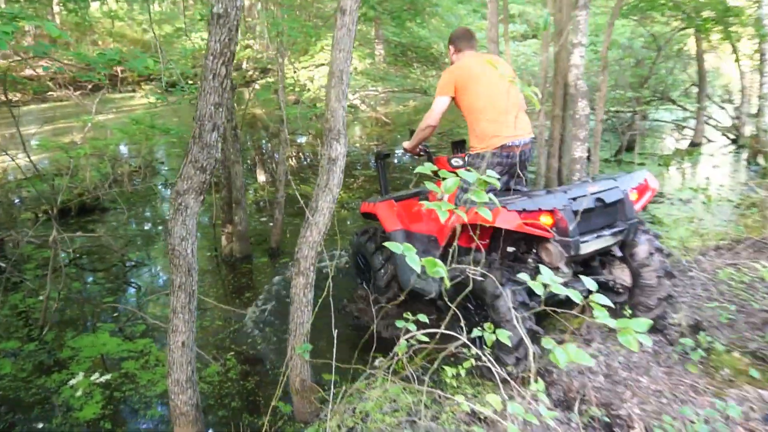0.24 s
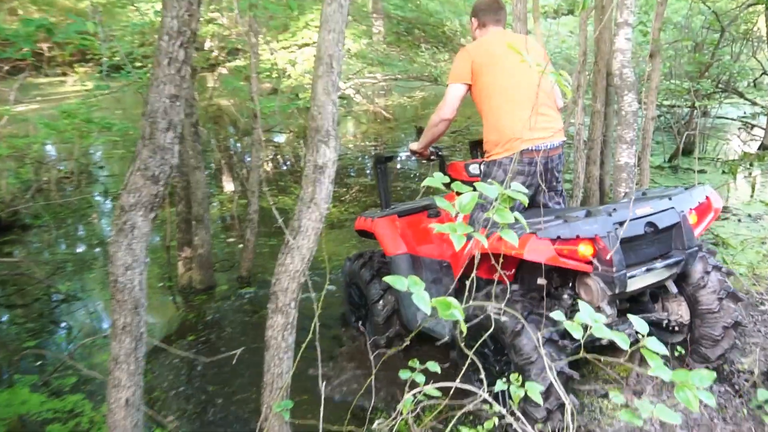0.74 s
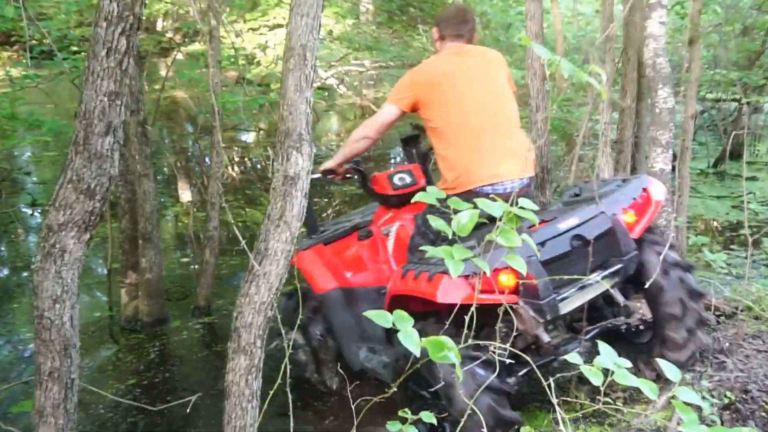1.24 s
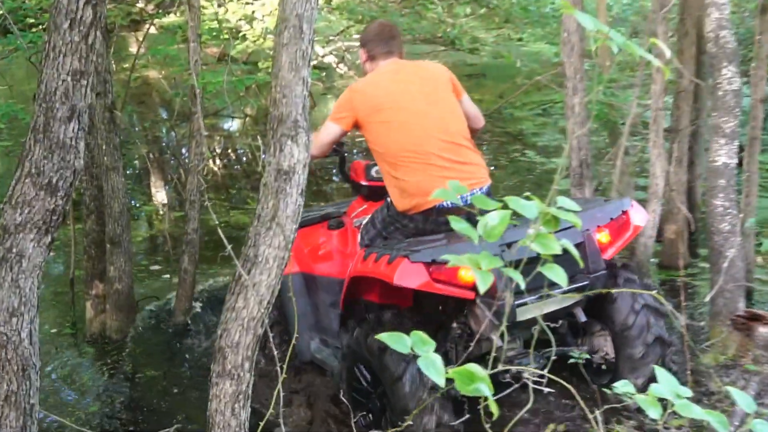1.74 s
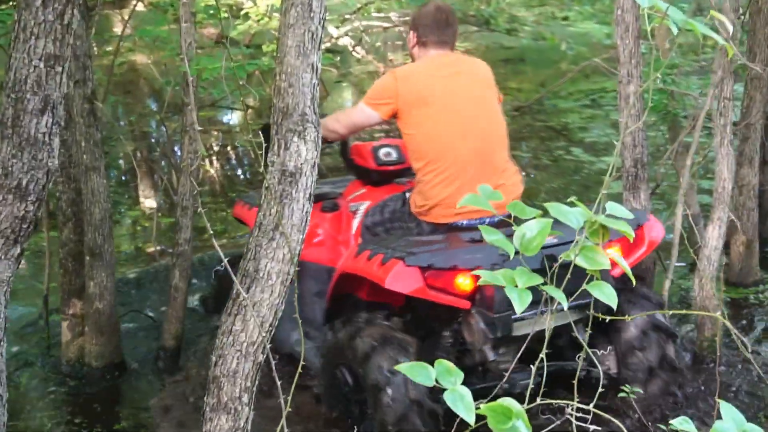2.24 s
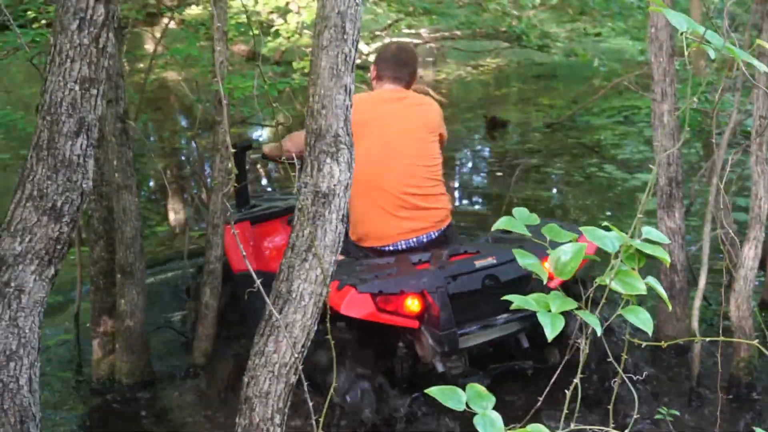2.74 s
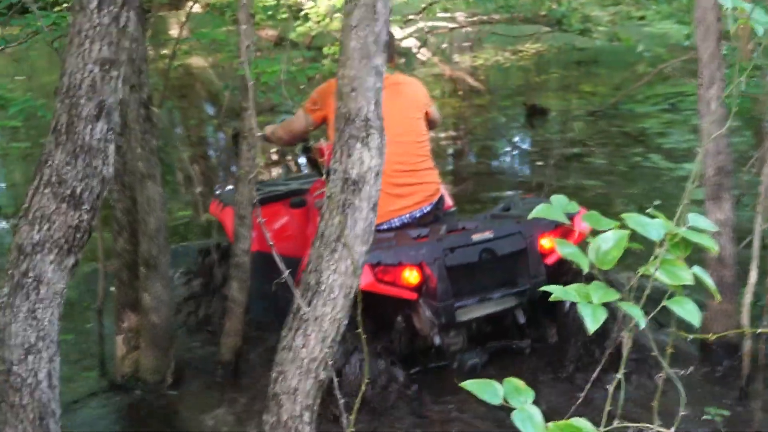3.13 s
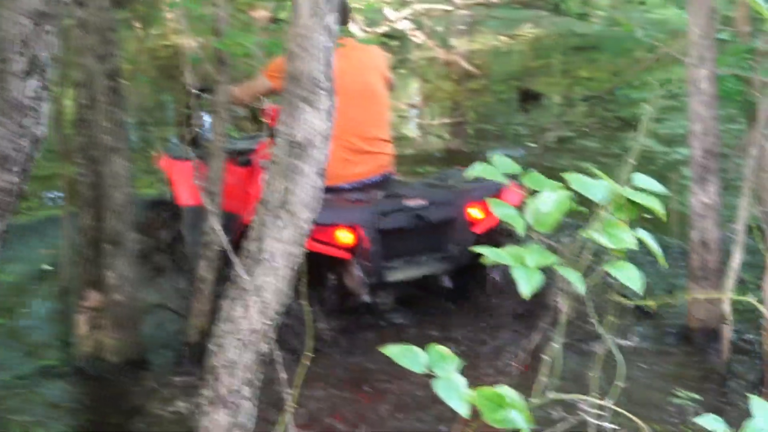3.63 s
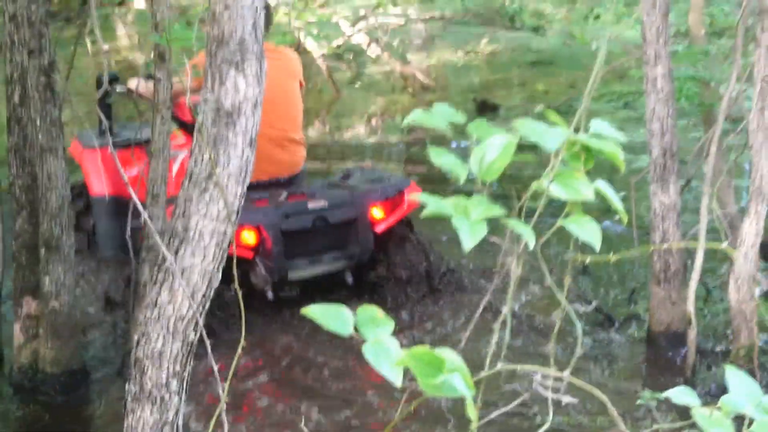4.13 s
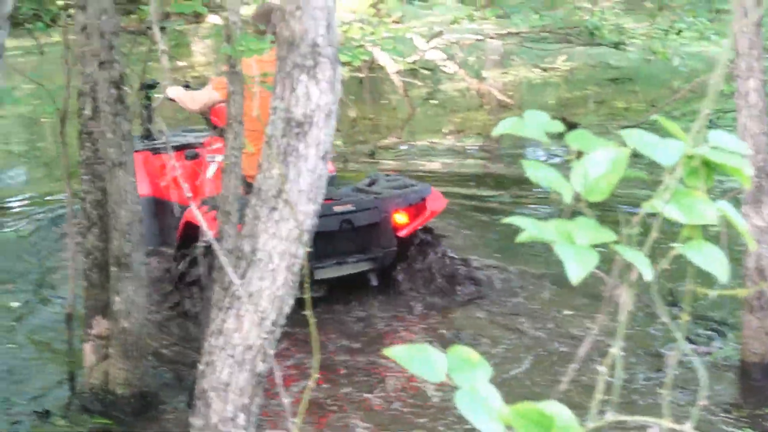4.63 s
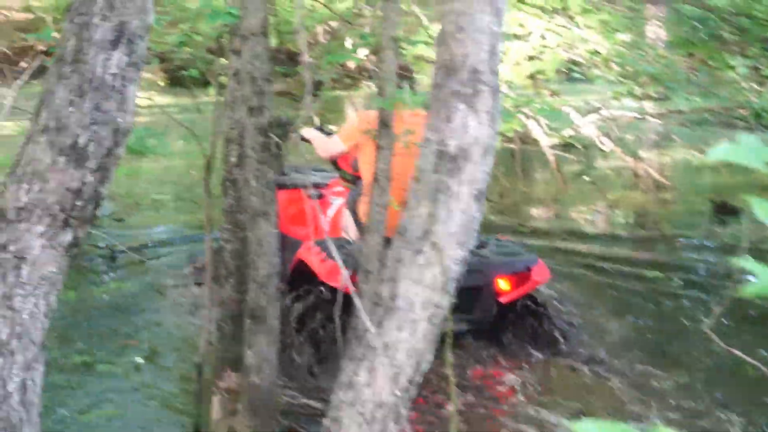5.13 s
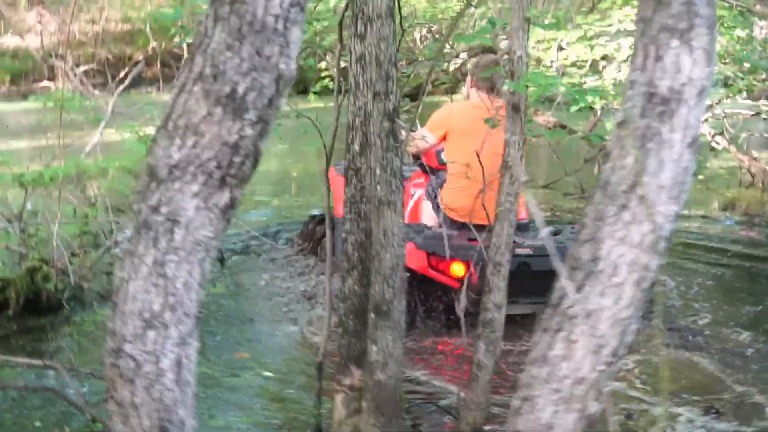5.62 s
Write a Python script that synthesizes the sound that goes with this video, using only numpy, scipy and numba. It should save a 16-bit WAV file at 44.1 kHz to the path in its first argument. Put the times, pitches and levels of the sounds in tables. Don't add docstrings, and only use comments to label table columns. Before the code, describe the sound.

A quad bike a few metres away drives into a woodland pond. Its uneven twin-cylinder engine starts with sharp cracks, climbs in a rough growl, drops, blips, drops again, then holds high revs. Loose metal rattles and buzzes, tyres churn the water with hissing spray, and bubbling gurgles gather near the end. Small stereo microphones outdoors, slightly overloaded, with a short echo from the trees.

```python
import sys
import numpy as np
from scipy import signal
from scipy.fft import next_fast_len
from scipy.io import wavfile
from scipy.ndimage import uniform_filter1d
from numba import njit

SR = 44100
rng = np.random.default_rng(int(sys.argv[2]) if len(sys.argv) > 2 else 0)


def dump_mix(stems):
    frames = np.atleast_2d(stems).T
    limited = np.clip(frames, -1, 1)
    pcm = np.round(limited * 32767).astype(np.int16)
    wavfile.write(sys.argv[1], SR, pcm)


def volts_from_db(level):
    exponent = np.asarray(level, float) / 20
    return 10 ** exponent


N = 258772

# f/Hz, width/Hz, level/dB
SHIELD_MODES = [(1549.5, 43, 14), (2106, 210, 10.5)]


def controls():
    # t/s, engine cycles/Hz
    speed = [(0.0, 15.8), (0.16, 12.09), (0.35, 15.87), (0.89, 23.02), (1.39, 24.34), (1.81, 15.7),
             (2.05, 20.62), (2.53, 24.87), (2.86, 15.45), (3.05, 21.82), (3.34, 21.12), (3.54, 24.05),
             (3.89, 23.61), (4.08, 24.49), (4.92, 22.47), (5.18, 25.7), (5.6, 24.61), (5.87, 25.83)]
    # t/s, throttle/0-1, silencer boom level/dB
    engine_load = [(0.0, .9, -29.5), (0.05, 1, -7.5), (0.11, 0.8, -36), (0.15, 0.97, -11.5),
                   (1.3, 0.98, -11), (1.42, 0.43, -20), (1.57, 0, -14), (1.78, 0, -19.5), (1.84, 1, -11),
                   (2.5, 1, -11), (2.58, 0.22, -15.5), (2.83, 0.13, -18.5), (2.9, 1, -13.5),
                   (3.28, 0.78, -10), (3.42, 1, -10.5), (5.05, 1, -10.5), (5.4, 1, -16.5), (5.87, 1, -14.5)]
    # t/s, depth/0-1, left minus right/dB
    wade = [
        (0.0, 0.2, -2.5),
        (0.5, 0.25, -4),
        (1.2, 0, -1),
        (1.9, 0.38, -1),
        (2.5, 0.62, -1),
        (3.3, 0.85, -1),
        (3.9, 0.93, 1.5),
        (4.9, 0.89, -0.2),
        (5.87, 0.88, -.7),
    ]
    (hz,), (throttle, boom_db), (depth, pan_db) = columns(speed), columns(engine_load), columns(wade)
    lag = int(0.11 * SR)
    gain_hz_per_s = uniform_filter1d(np.gradient(hz) * SR, lag, origin=(lag - 1) // 2)
    pull = np.tanh(np.clip(gain_hz_per_s, 0, None) / 12.4)
    return hz, np.clip(throttle, 0, 1), boom_db, depth, pan_db, pull


def layer_levels(hz, throttle, depth, pull):
    # level at full speed/dB, rise/dB per cycle Hz, throttle shut/dB, full depth/dB, gaining speed/dB
    level_laws = dict(bark=(-25, 1.25, -12, -7.5, 3), rasp=(-37, 1.2, 4.5, 9.5, 2),
                  drone=(-45.5, 0.2, -2, 18, 2.5), hum=(-23, 0, 4, -4.5, -1.5),
                  casing=(-32, .3, 0.1, 2.5, -1.5), covers=(3, .05, 3, -8.5, 3),
                  shield=(-34, 0.7, -0.5, -3.6, 0.7), gears=(-45, 0.8, 4, -11, 9.5),
                  rumble=(-33, 0.3, -0.5, 4, 0), churn=(-33, 0.22, 5.5, -0.2, -2),
                  spray=(-42.5, 0.24, 1.5, 1.2, -0.5))
    full_speed_hz = 24
    levels = {}
    for name, (full_db, per_hz, shut_db, deep_db, pull_db) in level_laws.items():
        riding = full_db + per_hz * (hz - full_speed_hz) + shut_db * (1 - throttle)
        levels[name] = riding + deep_db * depth + pull_db * pull
    return levels


def firings(hz, count=200):
    start_cycle, pipe_delay_s, gas_lag_s = 0.03, 0.0085, 0.004
    second_share, second_db = 0.387, 1.5
    cycle = start_cycle + np.cumsum(hz) / SR + pipe_delay_s * hz
    chance = rng.standard_normal((count, 2, 2))
    pulses = np.zeros(N)
    for k, (offset, db) in enumerate([(0, 0), (second_share, second_db)]):
        at = np.searchsorted(cycle, np.arange(count) + offset + 0.0025 * chance[:, k, 0])
        ok = (at > 0) & (at < N)
        pulses[at[ok]] = volts_from_db(db + 0.51 * chance[ok, k, 1])
    last = np.maximum.accumulate(np.where(pulses > 0, np.arange(N), 0))
    since = np.roll(np.arange(N) - last, int(gas_lag_s * SR)) / SR
    return pulses, since


def exhaust(pulses, hz, hum_db, *levels_db):
    # f/Hz, width/Hz, level/dB
    pipe_modes = [(245, 74, -1.5), (277.3, 25.7, 1.5), (314.9, 42, -1)]
    # f/Hz, width/Hz, level/dB
    frame_modes = [(55.3, 22.4, 0)]
    # f/Hz, width/Hz
    traps = [(172, 60), (255, 100)]
    second = np.cumsum(pulses > 0) % 2
    uneven = pulses * (1 - 0.5 * second) * volts_from_db(2.5 * rng.standard_normal(N))

    def chamber(drive, rest_hz, rise, width_hz):
        centre = rest_hz + rise * hz
        return svf(svf(drive, centre, width_hz), centre, width_hz)

    boom = chamber(pulses, 33, 3.55, 54.0)
    for trap_hz, width in traps:
        boom = boom - ring(boom, [(trap_hz, width, 0)])
    thud = chamber(pulses, 14, 2.3, 26.0)
    bark = chamber(pulses * (1 - 0.72 * second), 120, 2.75, 44.0)
    bark = bark - 1.03 * ring(bark, [(232, 160, 0)])
    rasp = sum(ring(uneven, [mode], order=2) for mode in pipe_modes[1:])
    drone = ring(uneven, pipe_modes[:1], order=2)
    voices = boom, -thud, bark, -rasp, -drone
    frame = even(ring(pulses, frame_modes, order=2)) * volts_from_db(hum_db)
    return frame + sum(even(v) * volts_from_db(db) for v, db in zip(voices, levels_db))


def metalwork(since, db):
    # f/Hz, width/Hz, level/dB
    casing_modes = [(500, 182, -2), (660, 280, 2), (800, 156, -0.5), (1053, 430, -5), (1457, 410, -5)]
    # f/Hz, width/Hz, level/dB
    gear_modes = [(5860, 120, -5), (4294, 130, -0.5), (3355, 120, -5), (11030, 1600, -9.5)]
    # f/Hz, width/Hz, level/dB
    cover_modes = [(775, 125, 1), (1340, 130, 2)]

    def rattle(decay_s, steady, uneven_db, rate):
        hits = (steady + np.exp(-since / decay_s)) * rng.standard_normal(N)
        return hits * volts_from_db(uneven_db * walk(rate))

    casing = even(ring(rattle(0.012, 0.57, 2.9, 18), casing_modes, order=2)) * volts_from_db(db["casing"])
    shield = even(ring(rattle(0.015, 0.26, 4.2, 21.95), SHIELD_MODES), 1.0) * volts_from_db(db["shield"] - 0.5)
    gears = even(ring(rattle(0.011, 0.033, 1.4, 20), gear_modes, order=2), 0.23) * volts_from_db(db["gears"])
    covers = sum(ring(casing, [mode]) for mode in cover_modes)
    return casing + (volts_from_db(db["covers"]) - 1) * covers + shield + gears


def chatter():
    # t/s, peak level/dB
    buzzes = [(0.822, -38), (0.9615, -36), (1.0952, -23), (1.2, -19), (1.254, -30), (1.364, -21),
              (1.4097, -39), (1.607, -27), (1.94, -31), (2.0354, -22.5), (2.1406, -24), (2.1925, -24.5),
              (2.4835, -39), (2.558, -23), (2.6125, -42), (2.705, -28), (3.1609, -22), (3.2535, -19.5),
              (3.3524, -25), (3.4466, -43), (3.69, -40), (3.7255, -43), (3.7865, -28), (3.831, -30),
              (4.174, -25), (4.469, -37), (4.5441, -42), (4.882, -29), (4.9214, -31), (5.539, -24.5)]
    out = np.zeros(N)
    t = np.arange(SR // 10) / SR
    shape = (1 - np.exp(-t / 0.005)) * np.exp(-t / 0.014)
    for (s, db), (pitch, turn) in zip(buzzes, rng.random((len(buzzes), 2))):
        i = int((s - 0.005) * SR)
        hz = SHIELD_MODES[0][0] * (0.99 + 0.02 * pitch)
        out[i:i + len(t)] += volts_from_db(db + 4.5) * shape * np.sin(2 * np.pi * (hz * t + turn))
    return out


def gurgles():
    # t/s, peak level/dB, f/Hz
    bubbles = [(3.622, -35, 557.4), (3.814, -32, 550), (3.964, -19, 562), (4.11, -19, 633), (4.2, -23, 650),
               (4.33, -21, 546), (4.55, -20, 577), (4.6, -17, 508), (4.755, -13.5, 590), (4.85, -21, 570),
               (5.125, -17, 622), (5.2, -19, 632), (5.28, -16, 653), (5.35, -19, 544), (5.4, -21, 663),
               (5.435, -17, 642), (5.48, -20, 670), (5.6, -14.5, 535), (5.635, -13.5, 655),
               (5.68, -14, 693), (5.72, -16, 660), (5.76, -16, 680), (5.8, -16, 526), (5.84, -12, 648)]
    out = np.zeros(N + SR)
    t = np.arange(SR // 10) / SR
    shape = (1 - np.exp(-t / 0.0013)) * np.exp(-t / 0.016)
    for s, db, hz in bubbles:
        i = int((s - 0.003) * SR)
        out[i:i + len(t)] += volts_from_db(db - 3.0) * shape * np.sin(2 * np.pi * hz * t * (0.99 + 1.0 * t))
    return out[:N]


def bursts():
    # t/s, peak level/dB, treble share/dB, t60/s
    cracks = [(0.046, -10.5, 8, 0.06), (0.0723, -9.5, -27, 0.076), (0.21, -20, -19, 0.077),
              (0.241, -16.5, -6, 0.051), (0.2894, -30, -3, 0.06), (0.3094, -29, -11, 0.067),
              (1.412, -24, -15, 0.047), (2.0874, -30, -14, 0.065), (2.8778, -12, -12, 0.08),
              (2.9388, -10, -20, 0.072), (2.9997, -15, -13, 0.11), (3.0394, -20, -7, 0.071)]
    low, high = np.zeros(N), np.zeros(N)
    t = np.arange(SR // 5) / SR
    onset = np.minimum(t / 0.00047, 1) * (1 + 1.7 * np.exp(-t / 0.0016))
    for s, db, treble_db, t60 in cracks:
        i = int(s * SR)
        tail = volts_from_db(db - 60 * t / max(t60, 0.01)) * onset
        low[i:i + len(t)] += tail
        high[i:i + len(t)] += tail * volts_from_db(treble_db)
    body = ring(rng.standard_normal(N), [(653, 420, 6.5), (2230, 500, 5.0), (4500, 1800, -3.0)])
    hiss = ring(rng.standard_normal((2, N)), [(10000, 22000, 0)])
    return low * body / np.std(body) * volts_from_db(-13.5) + high * hiss / np.std(hiss) * volts_from_db(-19)


def water(since, puff, pan_db, level_db):
    # f/Hz, level/dB per Hz
    churn_colour = [(200, -42), (400, 0), (1000, -3), (2000, 0.5), (3000, -4), (4500, -6), (6500, -13.5),
                    (9000, -23)]
    # f/Hz, level/dB per Hz
    spray_colour = [(2500, -8), (5000, -16), (7000, 3.5), (10000, -1), (13000, -1.5), (15500, -8.5)]
    steady = volts_from_db(np.array([level_db["spray"], level_db["churn"]]))
    spray_gain, churn_gain = np.sqrt(steady ** 2 + waves())

    def drops(rate, db):
        hits = 0.32 * volts_from_db(db * rng.exponential(size=N)) * (rng.random(N) < rate / SR)
        return 1 + signal.lfilter([0.4], [0.4, -0.397], hits)

    pulse = 1 + np.clip(puff, 0, 1) * 2.1 * np.exp(-since / 0.019)
    churn = wash(churn_colour, 0.93, drops(150, 0.67) * pulse ** 0.38, wide_hz=9700, count=10)
    churn = churn * churn_gain * volts_from_db(1.5)
    spray = even(wash(spray_colour, 0.43, drops(190, 0.4) * pulse, wide_hz=18700, count=5), 0.073)
    spray = spray * spray_gain * volts_from_db(0.5 + 1.3 * walk(25))
    return (churn + spray) * volts_from_db(np.array([pan_db, -pan_db]) / 2)


def waves():
    # t/s, hold/s, spray level/dB, churn level/dB
    sheets = [(0.0, 0.0036, -38, -31), (0.034, 0.022, -38, -30), (0.235, 0.011, -39.5, -43),
              (0.283, 0.0082, -32.5, -42), (0.367, .008, -42, -36), (0.407, 0.0086, -39, -33),
              (0.46, 0.0077, -43, -53), (0.634, 4.8, -41, -39), (1.398, 0.021, -33, -47),
              (2.875, .015, -30.5, -31), (2.926, 0.026, -35, -33.5), (2.987, .015, -34.5, -47),
              (3.403, 0.099, -42, -42), (3.864, 0.17, -35, -36), (4.15, 0.073, -36, -34.5),
              (4.536, 0.075, -36.5, -53), (4.715, .08, -40, -49), (4.81, 0.11, -33.5, -37),
              (4.954, 0.2, -36, -53), (5.16, 0.027, -33.5, -43), (5.33, 0.23, -40, -54),
              (5.47, 0.13, -37, -42), (5.562, .03, -36, -35), (5.797, .07, -38, -43)]
    return sum(volts_from_db(np.array(dbs))[:, None] ** 2 * swell(s, hold) for s, hold, *dbs in sheets)


def squeals(since):
    # t/s, hold/s, f/Hz, level/dB
    rubs = [(0.041, 0.01, 2290, -22), (0.042, .01, 1770, -30), (0.32, 0.99, 3000, -45),
            (0.66, 0.18, 5820, -45), (0.75, .45, 3980, -43.5), (1.99, 0.63, 5950, -45.5),
            (2.2, .27, 3420, -42), (2.56, .15, 5770, -47), (2.86, 0.14, 5370, -43), (3.35, 0.24, 5730, -41),
            (4.152, .15, 6100, -49), (5.161, 0.016, 1150, -28), (1.08, .3, 1540, -39),
            (3.3, .55, 1555, -41), (3.95, .5, 1555, -39), (4.85, .2, 1560, -40), (5.2, 0.23, 1060, -38),
            (5.6, .27, 1080, -38), (4.75, 1.3, 450, -39), (5.55, 0.23, 1707, -40.5)]
    rub = (0.4 + np.exp(-since / 0.012)) * rng.standard_normal(N) * volts_from_db(1.8 * walk(20))
    out = 0
    for s, hold, hz, db in rubs:
        band = ring(rub, [(hz, 0.055 * hz, 0)], order=2)
        out = out + band / np.std(band) * volts_from_db(db) * np.sqrt(swell(s, hold))
    return out


def low_rumble(db):
    # f/Hz, level/dB per Hz
    rumble_colour = [(25, -3), (40, -9), (120, 5.5), (200, 0.5), (300, -12), (450, -32)]
    return wash(rumble_colour, 3, 1, wide_hz=400, count=5) * volts_from_db(db)


def trees(x):
    t60_s, band_hz = 0.56, (330, 3000)
    t = np.arange(SR // 2) / SR
    echo = rng.standard_normal((2, len(t))) * volts_from_db(-60 * t / t60_s) * (t > 0.008)
    echo /= np.sqrt(np.sum(echo ** 2, axis=1, keepdims=True))
    echo = signal.lfilter(*signal.butter(2, band_hz, "band", fs=SR), echo)
    return signal.oaconvolve(x[None], echo, axes=1)[:, :N]


def swell(s, hold):
    t = np.arange(N) / SR - s
    fall_s = 0.004 + 0.18 * hold
    return np.clip(t / 0.0079, 0, 1) ** 2 * np.exp(-np.clip(t - hold, 0, None) / fall_s)


def wash(colour, flicker_db, grain, wide_hz, count):
    hz, db = np.transpose(colour)
    step = (hz[-1] / hz[0]) ** (0.5 / count)
    out, noise = 0, grain * rng.standard_normal((2, 2, N))
    for k, centre in enumerate(np.geomspace(hz[0] * step, hz[-1] / step, count)):
        sos = signal.butter(2, [centre / step, centre * step], "band", fs=SR, output="sos")
        mid, side = signal.sosfilt(sos, noise[k % 2])
        gain = volts_from_db(np.interp(np.log(centre), np.log(hz), db) + flicker_db * walk(12))
        width = np.clip(centre / wide_hz, 0, 1)
        out = out + gain * (mid + width * side * np.array([[1], [-1]]))
    return out / np.std(out.mean(axis=0))


def ring(x, modes, order=1):
    out = 0
    for k, (hz, width, db) in enumerate(modes):
        b, a = signal.iirpeak(hz, hz / width, SR)
        y = x
        for _ in range(order):
            y = signal.lfilter(b, a, y)
        out = out + (-1) ** k * volts_from_db(db) * y
    return out


@njit
def svf(x, hz, width):
    y, b, l = np.empty(len(x)), 0., 0.
    for i in range(len(x)):
        g, k = np.tan(np.pi * hz[i] / SR), width / hz[i]
        v = (b + g * (x[i] - l)) / (1 + g * (g + k))
        b, l, y[i] = 2 * v - b, l + 2 * g * v, k * v
    return y


def even(x, seconds=0.12):
    k = int(seconds * SR)
    return x / np.sqrt(uniform_filter1d(uniform_filter1d(x ** 2, k), k) + 1e-12)


def walk(rate):
    k = int(SR / rate)
    levels = rng.standard_normal(size=400)[np.arange(N) // k]
    return 0.98 * uniform_filter1d(uniform_filter1d(levels, k), k)


def columns(table):
    s, *rest = np.transpose(table)
    return [np.interp(np.arange(N) / SR, s, c) for c in rest]


def scene():
    hz, throttle, boom_db, depth, pan_db, pull = controls()
    db = layer_levels(hz, throttle, depth, pull)
    thud_db = -13 + 20 * np.log10(1.02 - throttle)
    pulses, since = firings(hz)
    engine = exhaust(pulses, hz, db["hum"], boom_db, thud_db, db["bark"], db["rasp"], db["drone"])
    engine = engine + metalwork(since, db) + chatter() + gurgles()
    puff = throttle * (1 - depth) + 0.9 * pull
    wet = water(since, puff, pan_db, db) + bursts() + squeals(since)
    bass = signal.filtfilt(*signal.butter(2, 260, fs=SR), engine)
    ports = 0.12 * signal.hilbert(bass, next_fast_len(N))[:N].imag * np.array([[1], [-1]])
    return engine + ports + volts_from_db(-10.5) * trees(engine) + wet + low_rumble(db["rumble"])


def band_limit(x):
    return signal.sosfilt(signal.butter(12, 15710, fs=SR, output="sos"), x)


def record(dry):
    x = signal.lfilter(*signal.butter(2, 35, "high", fs=SR), dry)
    mix = np.tanh(0.84 * x) / 0.93
    return band_limit(mix)


dry = scene()
out = record(dry)
dump_mix(out)
```